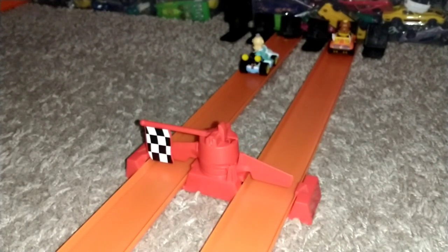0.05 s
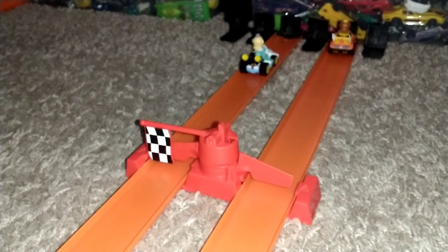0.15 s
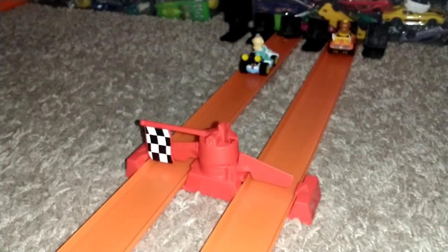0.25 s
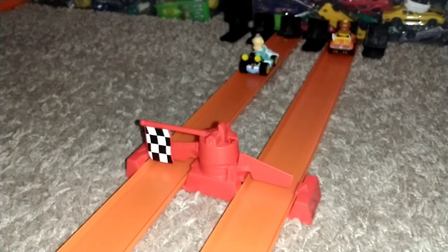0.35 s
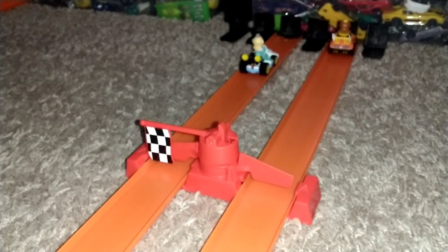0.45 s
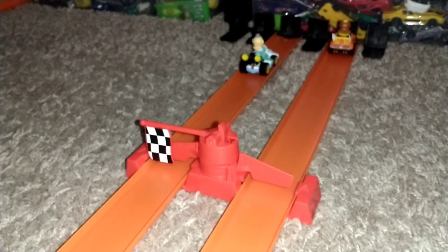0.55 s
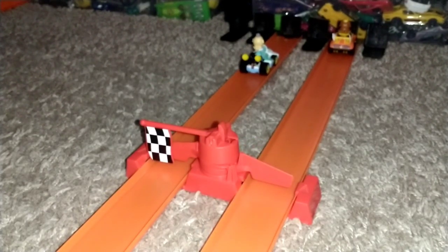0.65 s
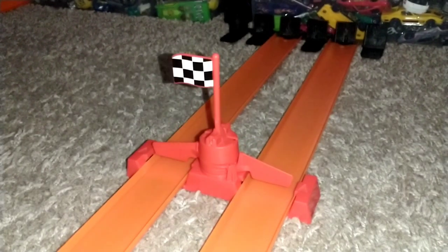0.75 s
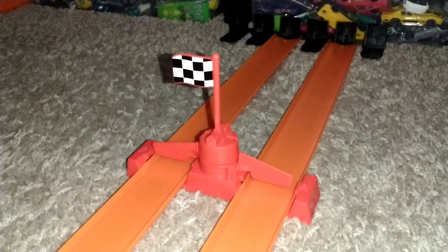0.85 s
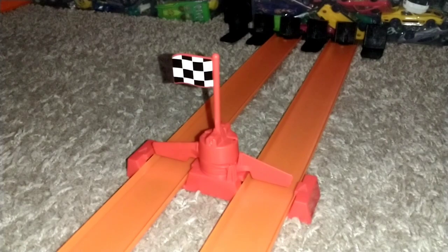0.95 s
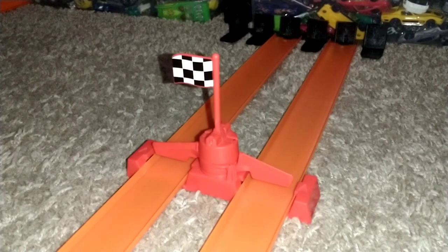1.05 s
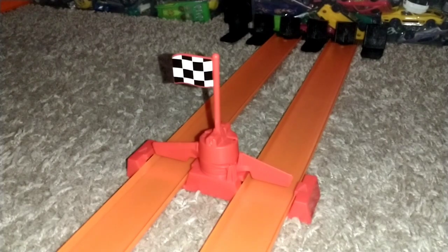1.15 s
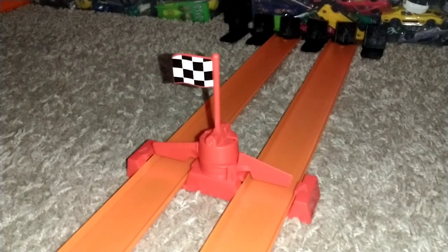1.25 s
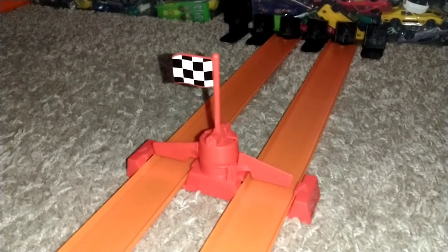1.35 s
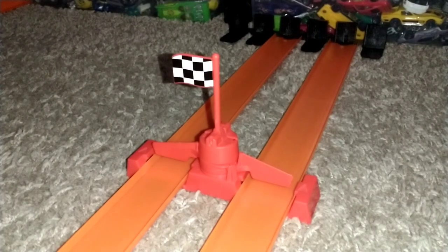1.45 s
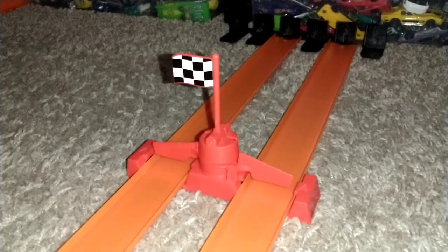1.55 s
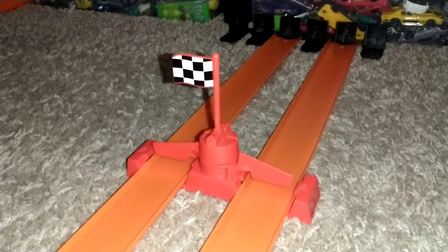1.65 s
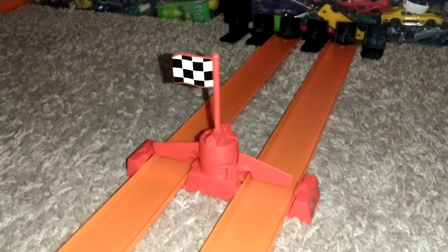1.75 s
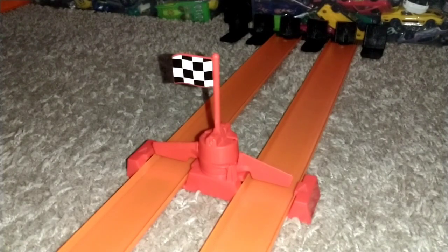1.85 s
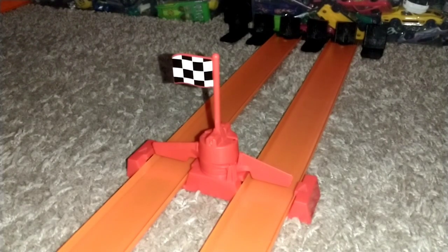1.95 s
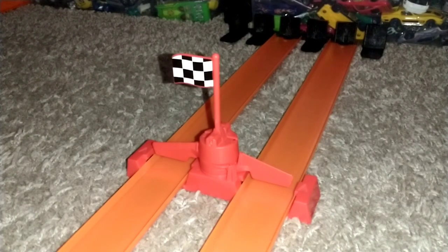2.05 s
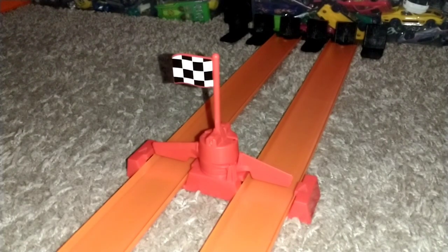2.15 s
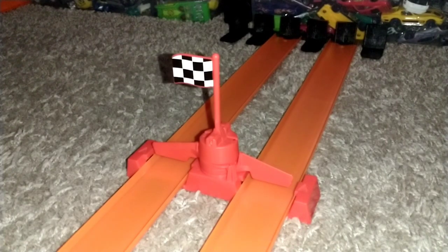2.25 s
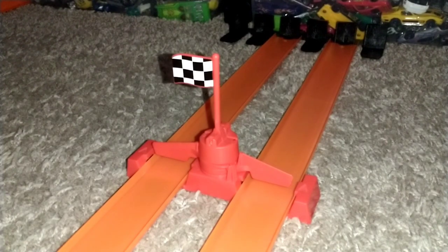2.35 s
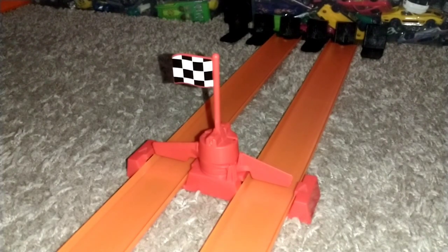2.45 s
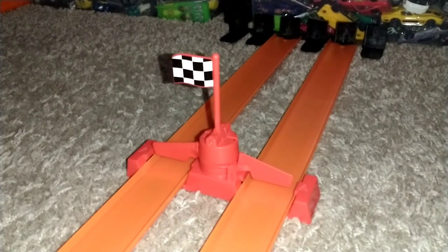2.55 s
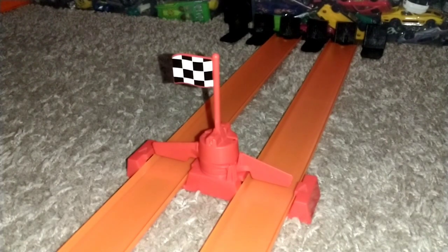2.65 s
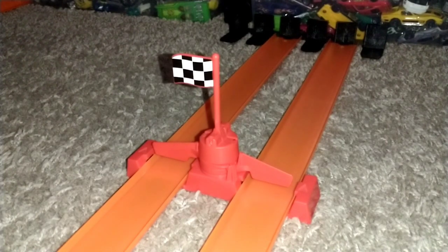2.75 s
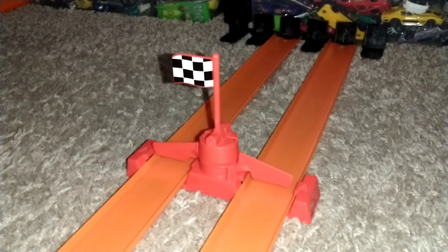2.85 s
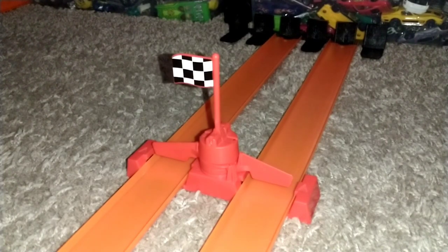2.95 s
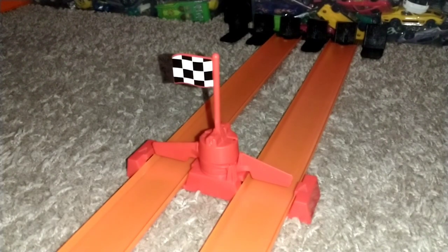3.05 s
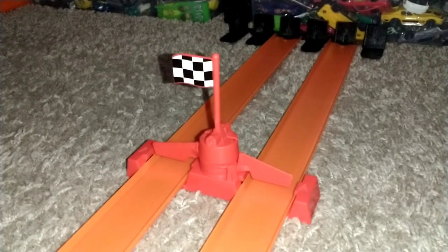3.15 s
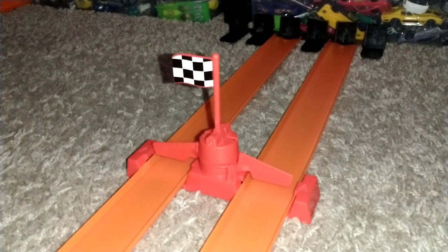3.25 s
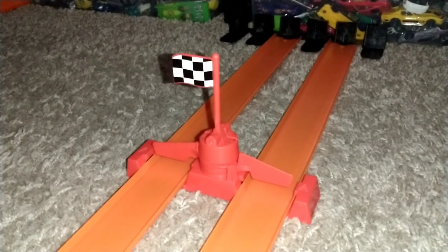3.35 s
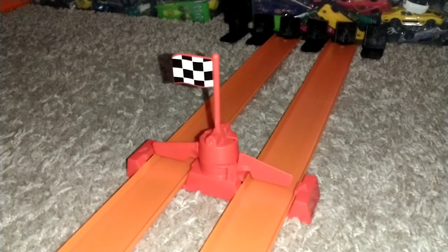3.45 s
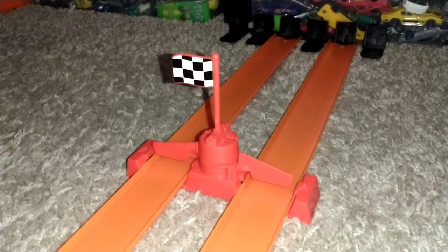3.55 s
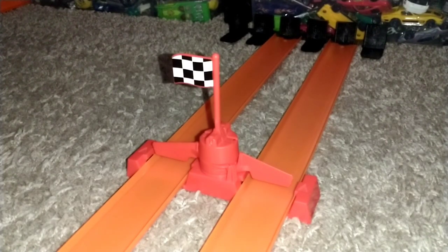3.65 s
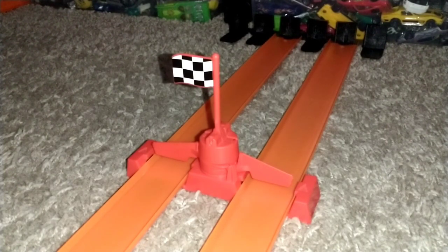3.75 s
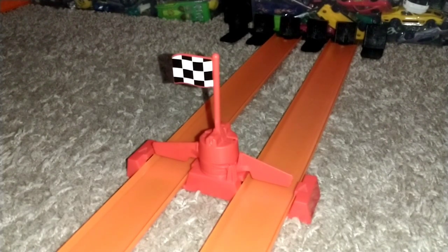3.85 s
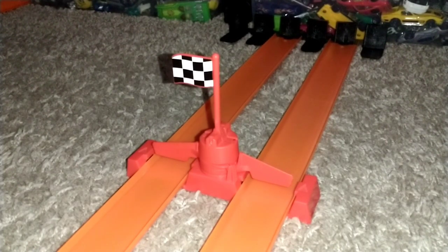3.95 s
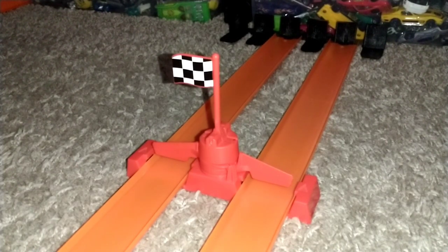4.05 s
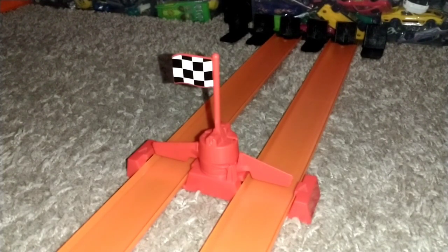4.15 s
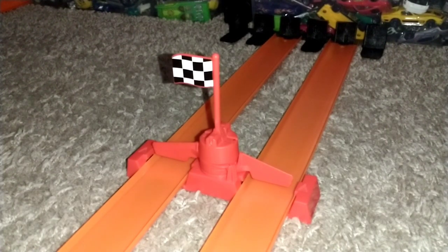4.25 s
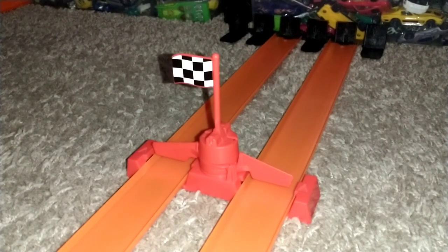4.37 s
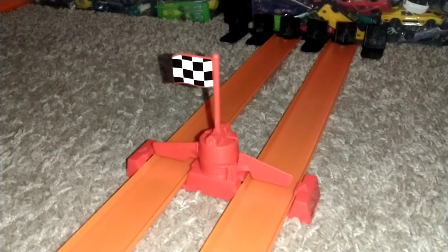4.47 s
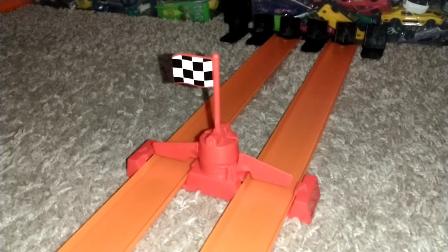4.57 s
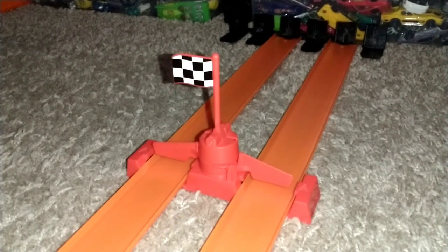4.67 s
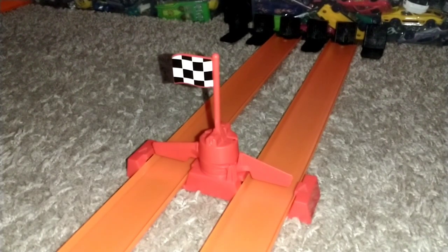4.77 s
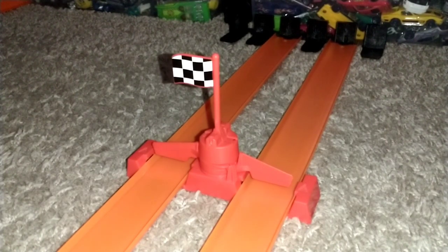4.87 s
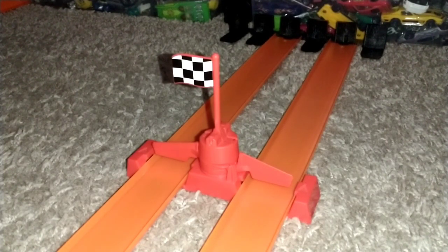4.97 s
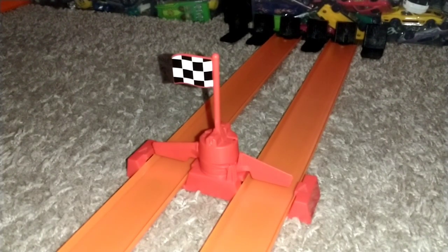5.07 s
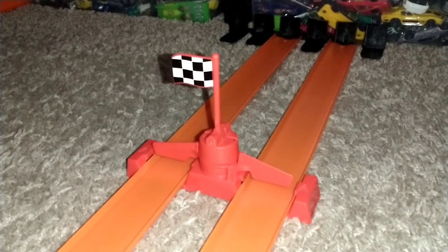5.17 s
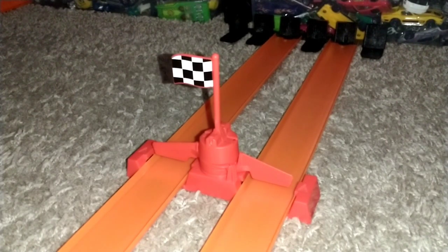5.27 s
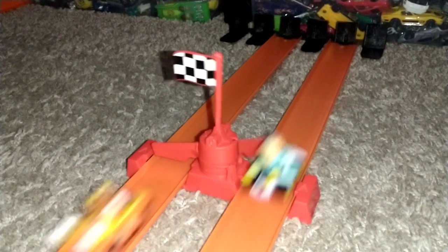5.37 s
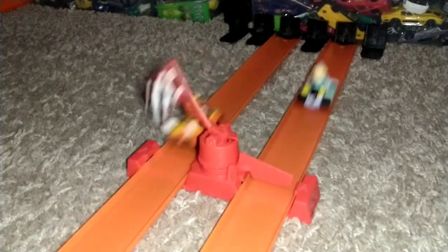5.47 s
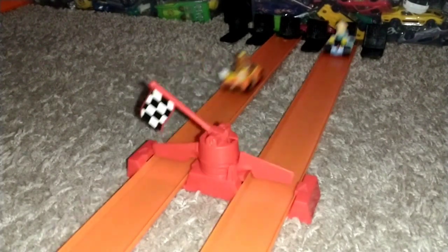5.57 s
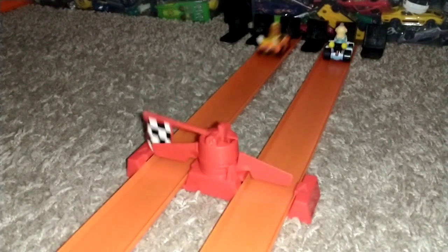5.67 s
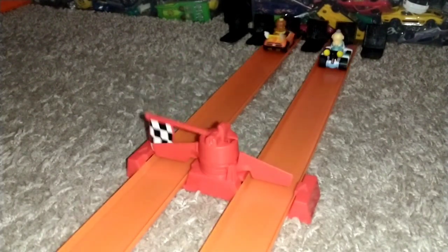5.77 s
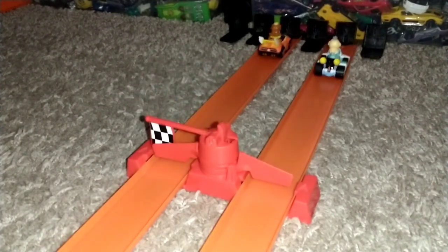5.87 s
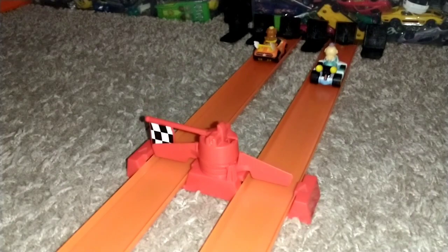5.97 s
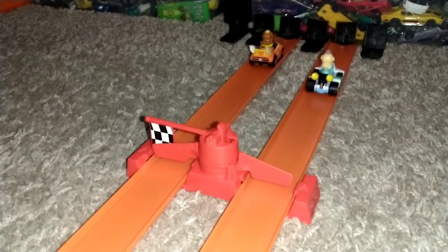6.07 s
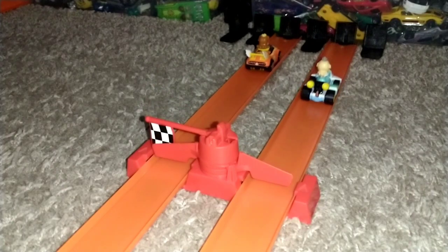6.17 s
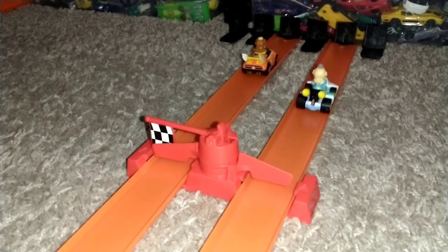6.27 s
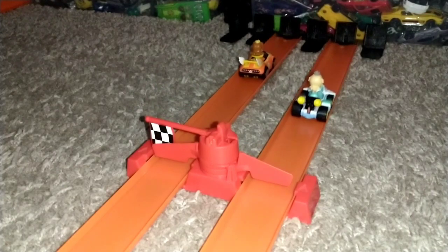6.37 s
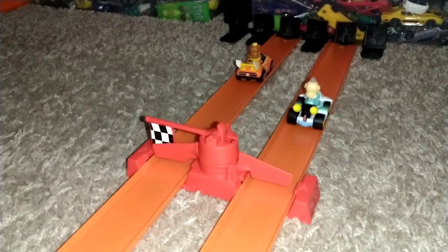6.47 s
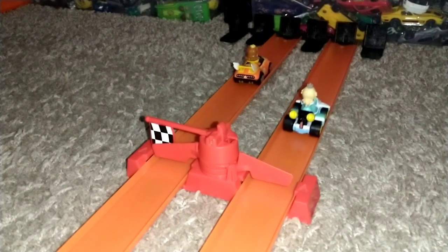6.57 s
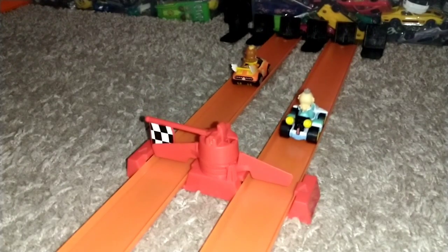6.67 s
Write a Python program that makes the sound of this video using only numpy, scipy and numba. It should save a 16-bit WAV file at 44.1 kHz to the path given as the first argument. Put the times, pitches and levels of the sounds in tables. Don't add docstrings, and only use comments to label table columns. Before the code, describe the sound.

A small, soft-furnished room, heard from a phone on the carpet. From 0 to 1.6 seconds there is only faint low hum and hiss, with a barely audible touch near 0.6 and complete silence from about 0.7 to 1.0. Soft rustles at 1.6-1.8 precede the release of two toy cars. From 1.9 tiny clicks quickly grow into a dense plastic rattle, strong by 2.3-3.4, with sharp joint cracks, axle chatter, short metallic-sounding pings and a faint rising wheel hum. A crack at 3.5 marks a bend; the rush thins from 4.0 to 4.8, with a low thrum near 4.45. It swells again, leaning left, with two cracks around 5.1. From 5.25 to 5.6 loud, hard clacks tumble together, followed by a hollow knock at 5.71. Rolling stops by 5.85, leaving a few fading ticks and quiet hum until the end.

```python
import sys
import numpy as np
from scipy import signal
from scipy.fft import rfft, irfft, next_fast_len
from scipy.io import wavfile
from scipy.ndimage import uniform_filter1d
from numba import njit

SR = 44100
rng = np.random.default_rng(int(sys.argv[2]) if len(sys.argv) > 2 else 0)


def master_out(mix):
    frames = np.transpose(np.atleast_2d(mix))
    ceiling = np.clip(frames, -1, 1)
    pcm = np.round(ceiling * 32767).astype(np.int16)
    wavfile.write(sys.argv[1], SR, pcm)


def ratio_of_db(decibels):
    return 10 ** (np.asarray(decibels, float) / 20)


N = 296307

# f/Hz, width/Hz, boost/dB
HUM = [(15, -73), (25, -48.5), (63, -10.5), (170, -14), (211, -4.5), (316, -17.5), (361, -11), (527, -11.5),
       (587, -20), (812, -15.5), (1320, -25.5), (1550, -21), (2520, -28), (7030, -33), (15800, -39)]
HUM_RING = [(206, 30, 2), (1540, 70, 5), (2190, 70, 8), (88, 17, 4), (354.5, 16, 6), (549, 25, 8)]
# t/s, peak level/dB, f/Hz
RUSTLE = [
    (1.62, -68, 7500),
    (1.785, -71, 8000),
    (.612, -74, 9500),
]
# t/s, peak level/dB, crack f/Hz, left minus right/dB
JOINTS = [(1.849, -55, 2200, 1.5), (1.914, -33.5, 3200, 5), (1.9874, -28, 2846, 0),
          (2.0038, -29, 3790, 2.5), (2.02, -28.5, 3727, 7), (2.0463, -25, 6320, 4), (2.058, -19, 7770, 2),
          (2.142, -23.5, 2875, 2.5), (2.1906, -21, 3510, 8), (2.3183, -11.5, 7820, 5),
          (2.359, -12, 4290, 5.5), (2.5002, -13.5, 2210, 0), (2.5306, -8, 5180, 10.5),
          (3.069, -14, 4710, 5), (3.537, -16, 7970, 4), (4.0934, -29, 3150, 2.0), (4.2094, -30, 3150, 1.0),
          (5.086, -13, 2763, 4.5), (5.1685, -12.5, 2885, 8)]

# t/s, rattle level/dB, left minus right/dB, how openly the cars face the phone/dB
ROLL = [(1.912, -54, 4, -2), (2.02, -47, 3, 3.5), (2.13, -42, 3.5, -3.5), (2.3, -29, 3.5, -1.5),
        (2.54, -24, 5, -0.5), (2.704, -22, 3.7, 2), (2.74, -24.3, 4, 1.3), (3.09, -23.5, 4.5, 0.5),
        (3.14, -26, 2, -1), (3.32, -24.5, 0.3, 2), (3.53, -36, 0.5, -4.5), (3.546, -31.5, 0, -0.5),
        (3.72, -26.5, 1.2, -2.5), (3.974, -33, 1.7, 2.3), (4.03, -37.5, 2, -5.5), (4.586, -43, 0.7, 6),
        (4.87, -38.5, 3, 5.5), (5.09, -29.5, 7, -2.5)]
RUNOUT = [(5.22, -25.5, 9.9, 1.5), (5.34, -25.5, 7.1, -3), (5.38, -27.5, .1, 1), (5.596, -30, .1, -0.5),
          (5.638, -35.5, 0.094, 0.5), (5.756, -36, .1, 1), (5.848, -70.5, .1, -9), (6.15, -71.5, .1, -3),
          (6.5, -81, .1, 0)]
# t/s, width/s, rattle swell/dB, floor thrum swell/dB
SWELLS = [(2.065, 0.021, 10, -1), (2.37, 0.06, -0.8, 1.5), (3.33, 0.04, -2.8, 5), (4.45, 0.087, 1.8, 10),
          (3.275, .03, 2.5, 1), (5.16, .06, 1.5, .1), (5.75, 0.056, -0.3, 9.5), (1.965, .02, -2, .1),
          (5.352, .01, -2, .1), (5.402, .008, -3, .1), (5.705, .008, -4, .1), (4.6, .03, -1.5, .1),
          (3.21, .035, -2.8, .1), (3.65, .035, -2.2, .1), (2.115, .025, -3, .1), (3.82, .06, 1.6, .1),
          (3.988, .015, 2.2, .1), (2.2, .04, -1.5, .1), (1.93, .05, .1, 8)]
# floor thrum/dB, rumble/dB, axle hiss/dB
STRETCHES = [
    (1.912, -53.5, -49, -49),
    (2.3, -55, -42.5, -45.5),
    (2.85, -53.5, -44.5, -41.5),
    (3.53, -55, -40.5, -41),
    (4.03, -59, -47.5, -41.5),
    (4.28, -59, -47.5, -41.5),
    (4.85, -64, -47.5, -41),
    (5.35, -60, -46.5, -42),
]
# ticks/s^-1, axle chatter against ticks/dB, shake/dB, share common to both ports/0-1,
# left port lag/samples
WHEELS = [
    (11550, -4.5, 0.5, 0.23, -16),
    (12400, -0.5, 0.7, 0.26, -18),
    (12300, -8, 0.7, 0.11, -18),
    (11960, -6, 0.43, 0.18, -10),
    (11770, -6.5, 0.4, 0.15, -11),
    (11760, -6.5, 0.38, 0.15, -11),
    (12000, -5, 0.76, 0.2, -14),
    (9000, -5.5, 1.5, 0.5, 4.5),
]
# f/Hz, density/dB per Hz
START = [(35, -54), (60, -31), (195, -7), (246, -11), (855, -8.5), (1130, -6.5), (2260, -6), (2710, -7),
         (7680, -11), (15000, -31)]
RAMP = [(35, -57), (60, -26.5), (141, -15.5), (224, -17.5), (458, -13), (503, -20.5), (679, -8.5),
        (1150, -13), (2260, -3), (2780, -4), (6840, -2.5), (15000, -19)]
FOOT = [(35, -49.5), (60, -29.5), (339, -14), (428, -10), (514, -16.5), (711, -7.5), (1210, -14.5),
        (2260, -4.5), (3500, -3.5), (5950, -0.5), (8230, -4), (15000, -25)]
BEND = [(35, -57), (60, -28), (135, -18.5), (276, -13), (309, -3.5), (480, -12.5), (619, -2), (1670, -5.5),
        (2980, -5.5), (7160, -1.5), (15000, -16)]
FAR = [(35, -48), (60, -14), (199, 1), (480, -15.5), (605, -6.5), (1300, -15), (2060, -7), (2650, -7),
       (3050, -3), (3930, -11), (7860, -9), (15000, -14)]
FLAT = [(35, -48), (60, -14), (199, 1), (480, -15.5), (605, -6.5), (1300, -13), (2060, -5.5), (2650, -7),
        (3050, -3), (3930, -9.5), (7860, -7), (15000, -14)]
NEAR = [(35, -63.5), (60, -34), (199, -24), (438, -29.5), (895, -15.5), (1560, -19), (1710, -10.5),
        (3190, -5), (4110, -9), (7160, -3.5), (15000, -15)]
MAT = [(35, -52.5), (60, -23), (170, -12.5), (372, -14), (619, -5.5), (982, -8.5), (2150, -2), (3930, -1.5),
       (7330, -2), (15000, -10)]
# f/Hz, width/Hz, boost/dB
START_RING = [(2240, 130, 1.0), (150.5, 26, 10.2)]
RAMP_RING = [(2240, 110, 4.5), (5240, 200, 0.5), (732, 130, -6), (4200, 360, 2.5), (140, 30, 2.5),
             (1288, 80, 5.5), (5770, 49, 3)]
FOOT_RING = [(2260, 150, 1.5), (322, 17, 8.3), (684, 120, 1.3), (5700, 240, 2.1)]
BEND_RING = [(3030, 520, 3.7), (844, 420, 3), (2480, 680, 3.2)]
FAR_RING = [(3150, 400, 6), (716, 160, 3), (6800, 2000, 2)]
FLAT_RING = [(3000, 1300, 3.2), (920, 130, 5.5), (7200, 2900, 3.7)]
NEAR_RING = [(3150, 750, 5.5), (7000, 1400, 3.5)]
MAT_RING = [(563, 120, 4), (2130, 200, 2.9)]
BAND_EDGES_HZ = (350, 1500, 9000)

# t/s, turns/s^-1, level/dB
SPIN = [
    (2.2, 95, -77),
    (2.35, 133, -63.5),
    (2.649, 155, -51),
    (2.85, 200, -67.5),
    (3.0, 175, -83),
]
# multiple, level/dB
SPIN_ORDERS = [(1, 2.5), (2, -9.5), (3, -10)]
# t/s, peak level/dB, f/Hz, left minus right/dB
RATTLES = [(2.2154, -26, 6030, 4.5), (2.2544, -25, 3930, 3.5), (2.2737, -23, 3080, 2.5),
           (2.4284, -19, 5150, 3.5), (2.4634, -16, 4950, 4.0), (2.5007, -11, 4730, 4.5),
           (2.6684, -12, 4280, 3.5), (2.8424, -15, 3840, 5.0), (2.8858, -13, 5460, 4.0),
           (2.9694, -11, 4540, 4.0), (2.9894, -14, 5560, 3.5), (3.0234, -11, 6100, 4.5),
           (3.248, -15, 5400, 1.5), (3.9674, -24, 7390, 1.0), (4.8814, -24, 5500, 3.5),
           (4.9724, -25, 7430, 5.5), (4.9914, -20, 7010, 5.5), (5.0449, -21, 3440, 6.0),
           (5.1354, -18, 3110, 7.0), (5.1986, -14, 4850, 10.0)]
# t/s, peak level/dB,
# f/Hz, left minus right/dB
PINGS = [(2.2587, -27, 2270, 3.0), (2.3131, -28, 2230, 3.5), (2.3425, -29, 2190, 3.5),
         (2.4622, -23, 2240, 3.0), (2.5096, -20, 2240, 3.0), (2.6743, -21, 2250, 4.0),
         (2.6937, -18, 2520, 4.0), (2.7167, -21, 2240, 4.5), (2.7441, -23, 2250, 2.0),
         (2.8309, -22, 2610, 2.5), (2.8613, -24, 2230, 4.0), (2.9671, -23, 2230, 2.0),
         (2.9821, -20, 2600, 3.0), (3.0544, -22, 2220, 2.0), (3.0798, -23, 2200, 1.0),
         (4.0568, -31, 3130, 4.5), (4.0737, -33, 3000, 1.5), (4.0947, -31, 3150, 3.5),
              (4.1925, -35, 3070, 0.5), (4.2099, -33, 3150, -1.0), (4.2603, -39, 3250, 0.5)]

# t/s, peak level/dB, crack f/Hz, hollow body against the peak/dB,
# left minus right/dB
KNOCKS = [(5.2533, -3.5, 6000, -40.5, 9.5), (5.3625, -2.5, 5200, -36.5, 3), (5.3752, -5.5, 8800, -36, -1.5),
          (5.4218, -8, 6200, -42.5, -0.5), (5.4418, -8, 8000, -31.5, -4),
          (5.4697, -18.5, 7510, -31.5, -3.5), (5.51, -19, 1800, -34, -2), (5.5358, -10, 6100, -28, -3.5),
          (5.5851, -7.5, 7540, -21.5, 1.5), (5.5914, -16, 1840, -17.5, -1),
          (5.6521, -22.5, 8450, -25.5, -3.5), (5.7126, -6.5, 6400, -13, -1.0),
          (5.7304, -24, 7540, -41, -4.5), (5.741, -21.5, 5220, -38.5, 3),
          (5.7588, -21.5, 3960, -26.5, -4.5), (5.7741, -27, 4700, -34, 1),
          (5.3643, -5, 7200, -40, 5.0), (5.3775, -18, 7000, -40, .1), (5.4205, -9, 10500, -42, .1),
            (5.427, -14, 6000, -40, .1), (5.539, -15, 4200, -35, .1), (5.5415, -17, 4600, -35, .1),
            (5.5915, -15, 4000, -35, .1), (5.718, -16, 4500, -30, .1), (5.409, -19.5, 8000, -30.5, .1),
            (5.4246, -6, 7900, -42, 0.1), (5.5867, -9.5, 2600, -11.5, 0.1), (5.7145, -12.5, 6200, -32, 0.1)]
# t/s, peak level/dB, f/Hz, left minus right/dB
GATE_PINGS = [(5.3632, -17, 5000, 3), (5.3735, -22, 1800, .1), (5.432, -24, 2300, .1),
              (5.5365, -24, 1900, .1), (5.5585, -27, 2300, .1), (5.5872, -16, 2650, .1),
              (5.594, -24, 1250, .1), (5.7165, -22, 3800, .1)]
# f/Hz, level/dB, t60/s
GATE = [(573, 5, 0.028), (450, -13, 0.1), (660, 3, 0.022), (760, -3, 0.019), (880, -10, 0.033),
        (1144, -10, 0.05), (1250, -3, 0.03), (1796, -4, .03), (2100, -7.5, .03), (2600, -7.5, 0.024),
        (230, -18, 0.096)]
TOY = [(571, 0.5, 0.036), (444, -20.5, .04), (650, 0.1, .035), (736, 4, .04), (820, -2.5, 0.044),
       (1020, -5, 0.049), (1050, -10.5, .04), (1270, -4, 0.049), (193, -11.5, 0.055)]
# t/s, peak level/dB, crack f/Hz, left minus right/dB
SETTLE = [(5.842, -38.5, 2060, 3), (5.8797, -44, 2044, 0.5), (5.9043, -52, 2150, 2.5),
          (5.9256, -54, 2080, 0), (5.9643, -56, 6130, 0), (5.9894, -60, 5370, -1.0),
          (6.0604, -60, 6490, 1.0), (6.1242, -60, 7000, -3), (6.4934, -65, 4920, -0.5),
          (6.5894, -64, 5170, 0)]

# f/Hz, width/Hz, boost/dB
TREBLE_SHAPE = [(14000, 2500, 3), (11500, 1500, -1.5)]
LEFT_PORT = [(9250, 12000, -2.5), (4700, 3160, 3)]
ROLL_TOP_HZ = 15150


def fft_hz(size):
    return np.maximum(np.arange(size // 2 + 1) * SR / size, 1)


def bumps(hz, rings):
    return sum(boost / (1 + (2 * (hz - c) / width) ** 2) for c, width, boost in rings)


def colour(hz, points, rings):
    f, db = np.transpose(points)
    return ratio_of_db(np.interp(np.log(hz), np.log(f), db) + bumps(hz, rings))


def unit(x):
    return x / np.sqrt(np.mean(x ** 2))


def walk(rate, size):
    k = int(SR / rate)
    held = np.repeat(rng.standard_normal(size // k + 1), k)[:size]
    return unit(uniform_filter1d(held, k))


def ports(hz, share, lag, make):
    common, left, right = rfft(make()), rfft(make()), rfft(make())
    share = np.clip(share + (1 - share) / (1 + (hz / 950) ** 2), 0, 1)
    delay = np.exp(-2j * np.pi * hz * lag / SR)
    together = np.array([common * delay, common])
    alone = np.array([left, right])
    return np.sqrt(share) * together + np.sqrt(1 - share) * alone


def hum():
    level_db, motor_hz, motor_db = -67.5, 211.5, -76
    hz = fft_hz(N)
    air = ports(hz, 0.12, 11.0, lambda: rng.standard_normal(N))
    air = irfft(air * colour(hz, HUM, HUM_RING) * (hz < ROLL_TOP_HZ + 300), N)
    motor_level = ratio_of_db(motor_db + 2.5 * walk(12, N))
    motor = motor_level * np.sin(2 * np.pi * np.cumsum(motor_hz + 3 * walk(8, N)) / SR)
    return unit(air) * ratio_of_db(level_db + .5 + 0.4 * walk(3, N)) + motor


def add(out, s, sound, pan_db):
    i = int(s * SR)
    out[:, i:i + sound.shape[1]] += sound * ratio_of_db(np.array([[pan_db], [-pan_db]]) / 2)


def crack(hz, t60, focus_db, top_hz):
    t = np.arange(4096) / SR
    decay = ratio_of_db(-60 * t / t60) + ratio_of_db(-26 - 60 * t / 0.092)
    shape = (1 - np.exp(-(t / 0.00072) ** 2)) * decay
    noise = rng.standard_normal((3, len(t)))
    noise = 0.62 * noise[0] + noise[1:]
    wide_band = signal.butter(2, (max(1200, .55 * hz), top_hz), "band", fs=SR, output="sos")
    peak_band = signal.butter(1, (hz / 1.115, hz * 1.16), "band", fs=SR, output="sos")
    wide = signal.sosfilt(wide_band, noise)
    peak = signal.sosfilt(peak_band, noise)
    burst = shape * (unit(wide) + ratio_of_db(focus_db) * unit(peak))
    return burst / np.sqrt(np.sum(burst.mean(axis=0) ** 2) / np.sum(shape ** 2)) / shape.max() / 2


def rustles(out):
    for s, db, hz in RUSTLE:
        add(out, s, ratio_of_db(db) * crack(hz, .3, 4.0, 10000), 0)


def joints(out):
    for s, db, hz, pan_db in JOINTS:
        add(out, s, ratio_of_db(db - 6.5) * crack(hz, 0.027, 8.1, 8000), pan_db)


@njit
def taps(at, turn, fade, loud, size):
    out = np.zeros(size + 768)
    for k in range(len(at)):
        z, p = loud[k] + 0j, fade * np.exp(1j * turn[k])
        for i in range(at[k], at[k] + 768):
            out[i] += z.imag
            z *= p
    return out[:size]


def chatter(size):
    per_s, t60_s, spread_db = 1800, .03, 1.6
    when, pitch, u = rng.random((2600, 3)).T
    used = np.arange(len(u)) < per_s * size / SR
    loud = ratio_of_db(-spread_db * np.log(1 - u)) * used
    turn = 2 * np.pi * (1300 + 10000 * pitch) / SR
    fade = float(ratio_of_db(-60 / SR / t60_s))
    return unit(taps((when * size).astype(int), turn, fade, loud, size))


def rolling(start, end, lows_db, points, rings, per_s, chatter_db, shake_db, share, lag):
    reference_db = -30
    s, db, pan_db, open_db = np.transpose(ROLL + RUNOUT)
    size = next_fast_len(int(1.2 * SR))
    t, hz = start + (np.arange(size) - 100) / SR, fft_hz(size)
    swell, thud = sum(np.outer(gain, np.exp(-((t - at) / width) ** 2)) for at, width, *gain in SWELLS)
    rattle_db = np.interp(t, s, db) + swell - reference_db
    open_db = np.interp(t, s, open_db)
    shake = ratio_of_db(shake_db * (walk(40, size) + walk(150, size)))

    def wheels():
        ticks = (rng.random(size) < per_s / SR) * rng.standard_normal(size)
        return shake * (unit(ticks) + ratio_of_db(chatter_db) * chatter(size))

    sound = ports(hz, share, lag, wheels) * colour(hz, points, rings) * (hz < ROLL_TOP_HZ)
    below = [1 / (1 + (hz / edge) ** 8) for edge in BAND_EDGES_HZ]
    parts = below[0], below[1] - below[0], below[2] - below[1], 1 - below[2]
    thrum_db, rumble_db, hiss_db = lows_db
    levels = (thrum_db + 0.49 * rattle_db - 0.24 * open_db + thud,
              rumble_db + 0.62 * rattle_db - 0.55 * open_db,
              reference_db + rattle_db,
              hiss_db + 0.95 * rattle_db + open_db)
    out = 0
    for part, level_db, aim in zip(parts, levels, (0.074, 0.33, 1, 0.12)):
        side = aim * np.interp(t, s, pan_db) * np.array([[.5], [-.5]])
        out = out + unit(irfft(sound * part, size)) * ratio_of_db(level_db + side)
    inside = uniform_filter1d(1. * (t > start) * (t < end), size=200)
    return ratio_of_db(1.5) * out * inside


def run_down_track(out):
    colours = START, RAMP, FOOT, BEND, FAR, FLAT, NEAR, MAT
    rings = START_RING, RAMP_RING, FOOT_RING, BEND_RING, FAR_RING, FLAT_RING, NEAR_RING, MAT_RING
    stop_s = 6.5
    ends = [row[0] for row in STRETCHES[1:]] + [stop_s]
    for (start, *lows_db), end, points, ring, wheels in zip(STRETCHES, ends, colours, rings, WHEELS):
        add(out, start - 100 / SR, rolling(start, end, lows_db, points, ring, *wheels), 0)


def spin():
    s, hz, db = np.transpose(SPIN)
    t = np.arange(N) / SR
    turn = 2 * np.pi * np.cumsum(np.interp(t, s, hz) * (1 + 0.013 * walk(25, N))) / SR
    tone = sum(ratio_of_db(order_db + 2.5 * walk(13, N)) * np.sin(k * turn) for k, order_db in SPIN_ORDERS)
    return tone * ratio_of_db(np.interp(t, s, db)) * (t > s[0]) * (t < s[-1])


def lone_rattles(out):
    for s, db, hz, pan_db in RATTLES:
        add(out, s, ratio_of_db(db - 6.5) * crack(hz, .022, 8.5, 9000), pan_db)


def ping(hz, t60):
    t = np.arange(4096) / SR
    modes = np.sin(2 * np.pi * hz * t) + .35 * np.sin(2 * np.pi * 1.07 * hz * t)
    ring = (1 - np.exp(-t / .0012)) * ratio_of_db(-60 * t / t60) * modes
    return np.array([np.roll(ring, 17), ring]) / np.abs(ring).max()


def chassis_pings(out):
    for s, db, hz, pan_db in PINGS:
        add(out, s, ratio_of_db(db - 2.5) * ping(hz, .04), pan_db)


def hollow(modes):
    t = np.arange(8192) / SR
    chance = rng.standard_normal((len(modes), 2)) * (1.5, .01)
    ring = 0
    for (hz, db, t60), (more_db, detune) in zip(modes, chance):
        ring = ring + ratio_of_db(db + more_db - 60 * t / t60) * np.sin(2 * np.pi * hz * (1 + detune) * t)
    high = signal.butter(4, 170, "high", fs=SR, output="sos")
    ring = signal.sosfilt(high, ring * (1 - np.exp(-t / 0.00074)))
    return np.tile(ring / np.sqrt(np.mean(ring[:400] ** 2)), (2, 1))


def knocks(out):
    toy_from_s = 5.7
    for s, db, hz, body_db, pan_db in KNOCKS:
        t60_s = max(.004 + .005 * db, .005)
        add(out, s, ratio_of_db(db) * crack(hz, t60_s, 4.4, 10500), pan_db)
        add(out, s, ratio_of_db(db + body_db) * hollow(TOY if s > toy_from_s else GATE), 0)
    for s, db, hz, pan_db in GATE_PINGS:
        add(out, s, ratio_of_db(db) * ping(hz, .018), pan_db)


def settling(out):
    for s, db, hz, pan_db in SETTLE:
        add(out, s, ratio_of_db(db) * crack(hz, .02, 7.0, 9000), pan_db)


def room(x):
    t60_s, level_db = 0.18, -17
    t = np.arange(SR // 2) / SR
    tail = rng.standard_normal((2, len(t))) * ratio_of_db(-60 * t / t60_s) * (t > .006)
    tail = signal.lfilter([1], [1, -.6], tail)
    tail = tail / np.sqrt(np.sum(tail[0] ** 2))
    return ratio_of_db(level_db) * signal.fftconvolve(x, tail, axes=1)[:, :N]


def scene():
    cars = np.zeros((2, N + 2 * SR))
    for source in (rustles, joints, run_down_track, lone_rattles, chassis_pings, knocks, settling):
        source(cars)
    cars = cars[:, :N] + spin()
    return cars + room(cars) + hum()


def top_cut(x):
    return signal.sosfilt(signal.butter(12, 16480, fs=SR, output="sos"), x)


def record(dry):
    headroom, top_hz = .95, 15700
    dropout_from_s, dropout_to_s = .680, .9975
    hz = fft_hz(N)
    dry = irfft(rfft(dry) * ratio_of_db(bumps(hz, TREBLE_SHAPE)), N)
    left = irfft(rfft(dry[0]) * ratio_of_db(bumps(hz, LEFT_PORT)), N)
    t = np.arange(N) / SR
    on = (t < dropout_from_s) | (t > dropout_to_s)
    rounded = headroom * np.tanh(np.array([left, dry[1]]) / headroom)
    top = signal.ellip(8, .2, 70, top_hz, fs=SR, output="sos")
    mix = signal.sosfilt(top, rounded) * on
    return top_cut(mix)


dry = scene()
out = record(dry)
master_out(out)
```